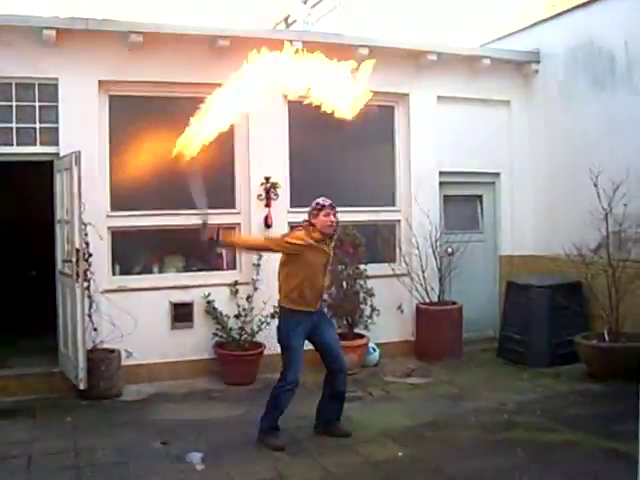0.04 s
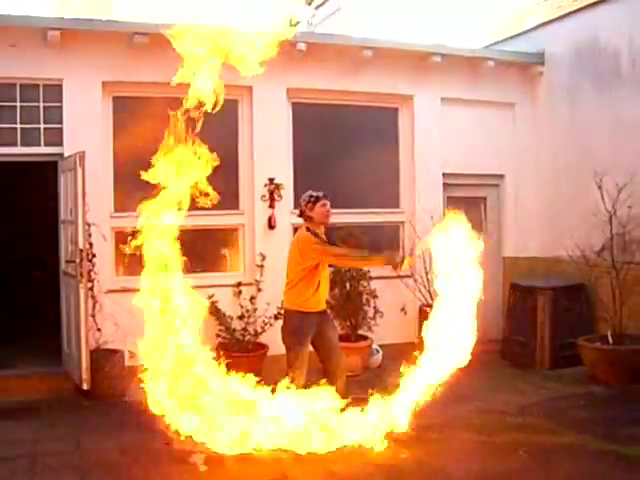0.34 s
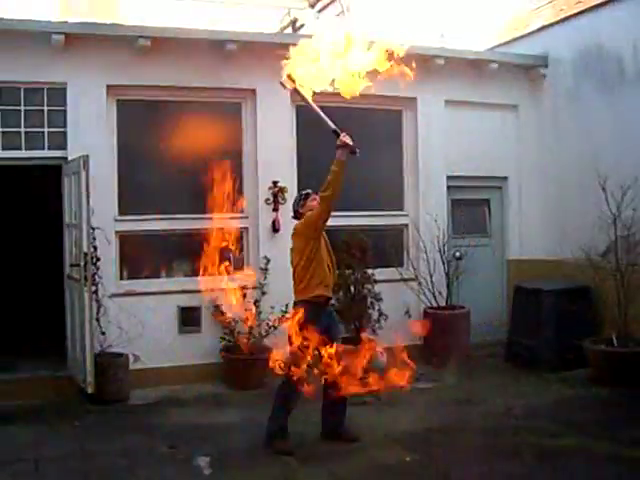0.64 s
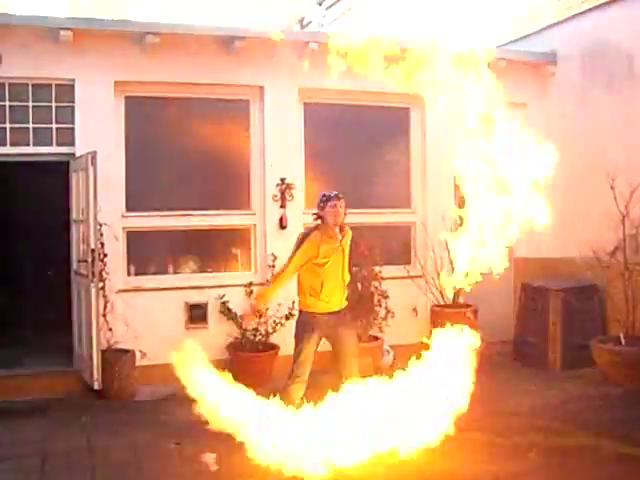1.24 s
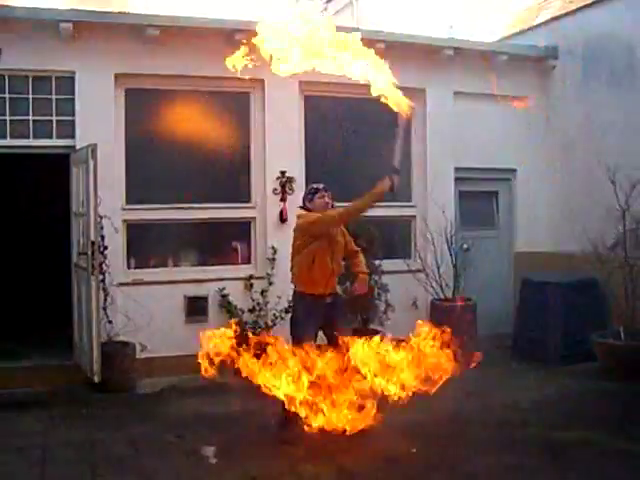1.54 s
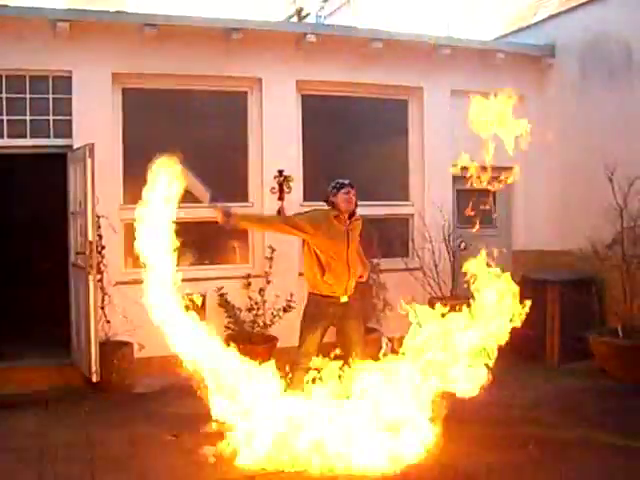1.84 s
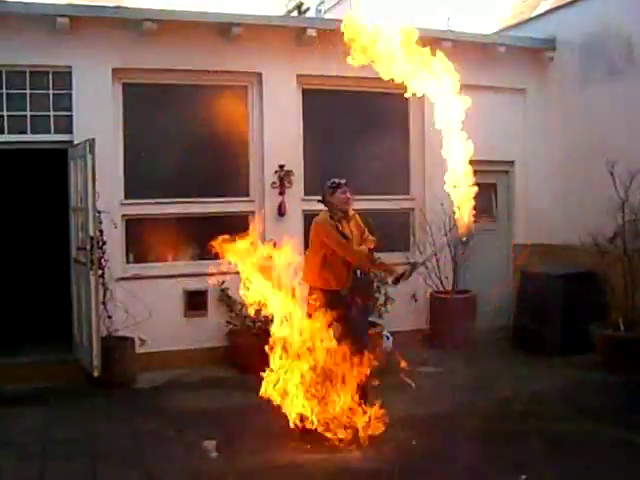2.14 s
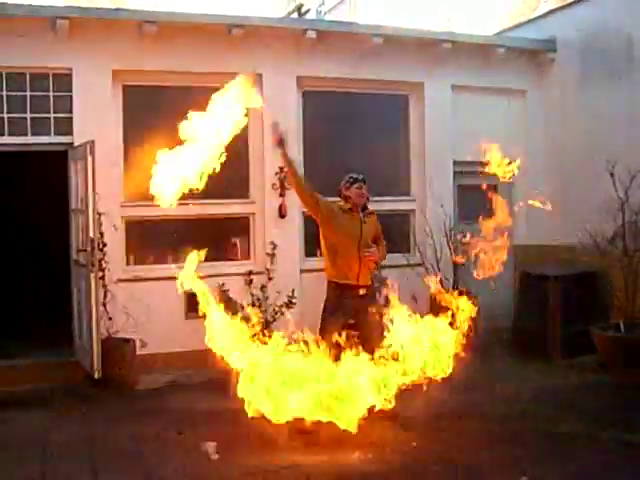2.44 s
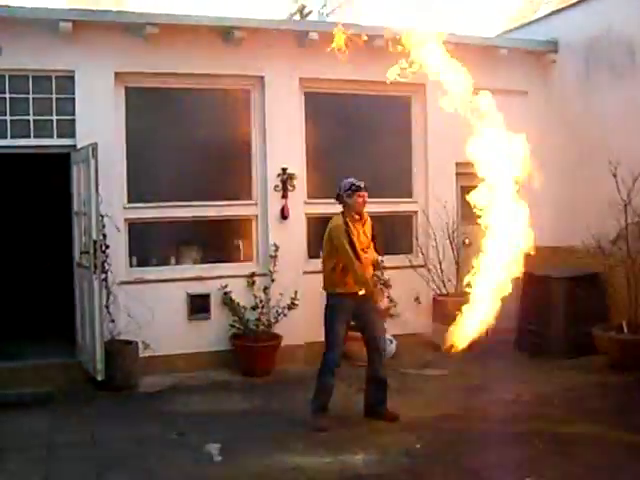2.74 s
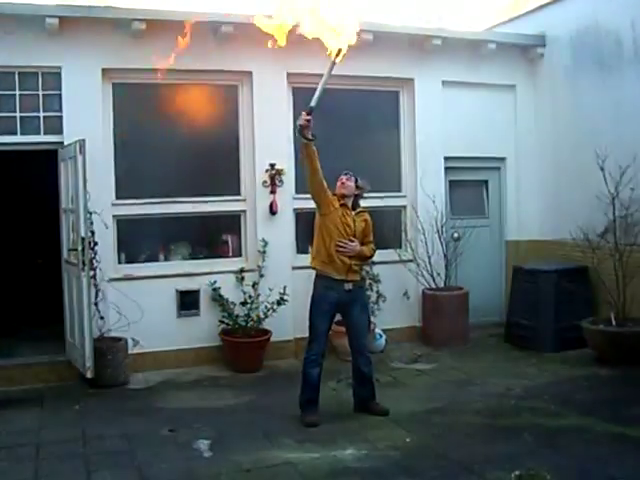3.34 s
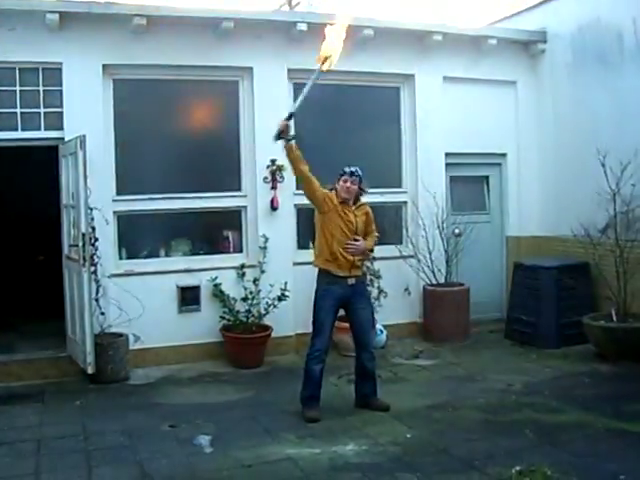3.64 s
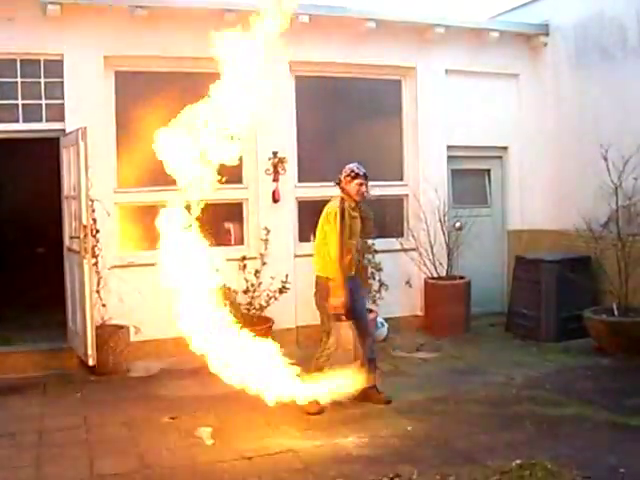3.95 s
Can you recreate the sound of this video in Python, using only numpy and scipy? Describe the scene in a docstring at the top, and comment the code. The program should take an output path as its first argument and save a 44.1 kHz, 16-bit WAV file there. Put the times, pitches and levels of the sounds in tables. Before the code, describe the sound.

A burning torch whooshes through the air right at the start, then again at about 1.2, 1.7, 2.3 and 2.8 seconds. Each sweep falls in pitch and trails a low, throbbing roar of flame, over a wavering hiss. From about 3.1 to 3.7 seconds the fire burns more quietly, before one last strong whoosh near 3.9 seconds. The courtyard walls add a faint, short echo.

```python
"""Flaming torch swung in a courtyard

A torch goes round in big circles, six sweeps in four seconds, with faint echoes off the walls.
Its head hisses as air feeds it; each sweep whooshes, then the trailing fireball roars and shoves
the air in slow throbs. A small camera microphone adds a bright peak and a narrow notch."""
import sys
import numpy as np
from scipy import signal
from scipy.fft import rfft, irfft
from scipy.io import wavfile
from scipy.ndimage import uniform_filter1d

SR = 44100
rng = np.random.default_rng(int(sys.argv[2]) if len(sys.argv) > 2 else 0)


def wrap_up_sound(samples):
    """Save the sound to the file named by the first command line argument, as 16-bit audio."""
    columns = np.atleast_2d(samples).T
    # keep every value between -1 and 1, then stretch to whole-number steps
    tamed = np.clip(columns, -1, 1)
    steps = np.round(tamed * 32767).astype(np.int16)
    wavfile.write(sys.argv[1], SR, steps)


N = 4 * SR


def amp(db):
    """Decibels to gain."""
    return 10 ** (np.asarray(db) / 20)


def unit(x):
    """Scales to an rms of 1."""
    return x / np.sqrt(np.mean(x ** 2) + 1e-20)


def curve(points, column=1):
    """One column of a time table, sample by sample."""
    table = np.transpose(points)
    return np.interp(np.arange(N) / SR, table[0], table[column])


def over_hz(points, hz):
    """Reads a table on a log-frequency axis."""
    table_hz, value = np.transpose(points)
    return np.interp(np.log(hz + 1), np.log(table_hz + 1), value)


def coloured(x, colour):
    """Gives x a spectrum, at an rms of 1."""
    gain = amp(over_hz(colour, np.fft.rfftfreq(N, 1 / SR)))
    return unit(irfft(rfft(x) * gain, N))


def flutter(rate_hz, depth_db):
    """Random gain of turbulence, wavering most at half of rate_hz."""
    hz = np.fft.rfftfreq(N, 1 / SR)
    wobble = irfft(rfft(rng.standard_normal(N)) * (hz / rate_hz) * np.exp(-hz / rate_hz * 2), N)
    return amp(depth_db * unit(wobble))


def pops(per_s, spread_db):
    """A random train of tiny bursts of unequal size."""
    size = amp(spread_db * np.minimum(rng.exponential(1, N), 5))
    return size * rng.choice([-1., 1.], N) * (rng.random(N) < per_s / SR)


def steadied(x, span_s):
    """Evens out the slow chance swells of a noise, so that the swing sets its level."""
    size = max(int(span_s * SR), 2)
    power = uniform_filter1d(uniform_filter1d(x ** 2, size), size)
    return x / np.sqrt(abs(power) + 1e-9)


def resonate(x, hz, width_hz):
    """A steep resonance that follows the curve hz."""
    turn = np.exp(2j * np.pi * np.cumsum(hz) / SR)
    pole = np.exp(-np.pi * width_hz / SR)
    return (turn * signal.lfilter([(1 - pole) ** 2], [1, -2 * pole, pole * pole], x / turn)).real


def add(mix, start_s, sound):
    """Mixes a sound in at a time, cutting what falls outside."""
    at = int(round(start_s * SR))
    sound = sound[max(-at, 0):]
    part = mix[max(at, 0):][:len(sound)]
    part += sound[:len(part)]


def courtyard(x):
    """A short wash of echoes off the walls, the high treble dying first."""
    # Each row: frequency in Hz, seconds for the echoes to fall by 60 dB.
    decay = [(60, 0.22), (500, 0.4), (3000, 0.34), (14000, 0.098)]
    first_wall_s = 0.0105
    echoes = rng.standard_normal(SR) * (rng.random(SR) < 1 / 20)
    echoes *= np.arange(SR) > first_wall_s * SR
    hz, t, bands = signal.stft(echoes, SR, nperseg=256)
    bands = bands * amp(-60 * t / over_hz(decay, hz)[:, None])
    tail = signal.istft(bands, SR, nperseg=256)[1]
    return signal.fftconvolve(x, tail / np.linalg.norm(tail))[:N]


def throb():
    """Slow pressure waves from the expanding hot air, with a quicker shudder on top."""
    # Each row: time in seconds, relative level of the throb in dB.
    levels = [(0, -32.5), (.2, -24), (.35, -15.5), (.45, -22), (.7, -21), (1.03, -29.5), (1.15, -18),
              (1.25, -22), (1.35, -18), (1.5, -22.5), (1.73, -20), (1.83, -14.5), (2.2, -16.5), (2.3, -18),
              (2.55, -22.5), (2.8, -17), (3.1, -31.5), (3.4, -24.5), (3.65, -40.5), (3.95, -16)]
    # A big flame heaves, a small one shudders. Each row: frequency in Hz, relative level in dB.
    heave_colour = [(2, -28), (6, -11), (10, 4), (15, -10), (28, -16), (48, -33), (120, -56), (500, -73)]
    shudder_colour = [(6, -22), (14, -6), (20, 3), (29, -4.5), (37, -7), (47, -13), (120, -40), (500, -68)]
    heave_db, shudder_db, shudder_db_per_db = -0.5, -10, 0.76
    level_db = curve(levels)
    heave = steadied(coloured(rng.standard_normal(N), heave_colour), span_s=0.11)
    shudder = steadied(coloured(rng.standard_normal(N), shudder_colour), span_s=0.15)
    return amp(heave_db + level_db) * heave + amp(shudder_db + shudder_db_per_db * level_db) * shudder


def torch_hiss():
    """Rushing gas and a fine sizzle of sparks, brighter when the torch burns harder."""
    # Each row: time in seconds, relative level of the hiss in dB.
    levels = [(0.0, -16.5), (0.23, -18), (0.47, -28), (0.57, -21), (0.62, -22), (0.7, -18.5), (0.79, -24),
              (0.91, -26), (1.02, -16.5), (1.11, -17), (1.15, -19.5), (1.27, -18), (1.3, -23.5),
              (1.37, -25.5), (1.68, -17.5), (1.71, -21), (1.75, -23), (1.78, -17), (1.84, -24.5),
              (1.9, -27.5), (2.02, -27.5), (2.08, -20.5), (2.16, -25), (2.33, -19), (2.38, -26.5),
              (2.45, -24.5), (2.53, -30), (2.64, -22.5), (2.68, -24), (2.72, -19), (2.94, -25.5),
              (3.03, -30.5), (3.24, -27), (3.39, -23), (3.53, -33.5), (3.58, -33.5), (3.7, -27.5),
              (3.72, -28.5), (3.82, -19.5), (3.94, -18.5), (3.97, -25.5), (4.0, -23)]
    # Spectrum of the burning head. Each row: frequency in Hz, relative level in dB.
    colour = [(200, -22), (700, -6), (1500, -1.5), (2000, -1), (2350, -3.5), (3000, 0.5), (5000, -0.5),
              (7500, -0.5), (12000, -3.5), (14000, -10), (17000, -14.5)]
    hiss_db, spark_db = -1.5, -17
    treble_hz, tilt_db_per_db = 7600, 0.23
    level_db = curve(levels)
    gas = rng.standard_normal(N)
    sparks = amp(spark_db) * unit(pops(per_s=2500, spread_db=2.5))
    rush = coloured(gas + sparks, colour) * flutter(rate_hz=41, depth_db=0.5)
    treble = signal.sosfiltfilt(signal.butter(3, treble_hz, "high", fs=SR, output="sos"), rush)
    tilt = amp(tilt_db_per_db * (level_db - level_db.mean()))
    return amp(hiss_db + level_db) * (rush - treble + tilt * treble) / np.sqrt(tilt)


def fireball():
    """Behind the torch, small pockets of fuel flare up and merge into a roar and a deeper boom."""
    # Each row: time in seconds, relative levels of the roar and of the boom in dB.
    levels = [(0.0, -23, -35), (0.06, -24.5, -25.5), (0.22, -22.0, -23), (0.54, -27.5, -31),
              (0.7, -36.0, -34.5), (1.02, -26.0, -23.5), (1.1, -21.5, -30.5), (1.2, -22.5, -22.0),
              (1.58, -27.0, -27), (1.68, -20, -20.5), (1.76, -19, -15.5), (1.84, -27.5, -26),
              (1.94, -26.5, -18), (1.98, -34, -32), (2.06, -25.5, -34), (2.14, -31.5, -32),
              (2.24, -22.5, -20.5), (2.32, -20.5, -22), (2.48, -34.0, -24.5), (2.56, -30, -33),
              (2.68, -25.5, -33), (2.84, -20, -17.5), (3.0, -28.5, -18.5), (3.08, -37, -28.0),
              (3.16, -33.0, -40), (3.22, -36.5, -32), (3.42, -32.0, -35.5), (3.58, -44.5, -42.5),
              (3.74, -31, -37), (3.84, -21, -20.5), (3.9, -22.0, -16.5), (4.0, -23.5, -24.0)]
    # Spectra of the roar and the boom as heard in the courtyard; the narrow peaks and dips in the bass are the
    # yard's own resonances. Each row: frequency in Hz, relative level in dB.
    roar_colour = [(90, -19.5), (135, -18), (158, 0), (176, -7), (195, 1.5), (222, 1.5), (285, -2),
                   (340, -7), (500, -12.5), (1200, -38)]
    boom_colour = [(30, -25), (45, -15), (53, -1.5), (62, -13), (70, 8), (80, -7.5), (90, -4.5), (101, 1.5),
                   (111, -2.5), (124, -1.5), (150, -11.5), (250, -24), (800, -60)]
    puffs_per_s, spread_db, roar_db = 1400, 3.0, 0.2
    roar = steadied(coloured(pops(puffs_per_s, spread_db), roar_colour), span_s=0.11)
    boom = steadied(coloured(pops(puffs_per_s, spread_db), boom_colour), span_s=0.083)
    burning = amp(roar_db + curve(levels)) * roar + amp(curve(levels, column=2)) * boom
    return burning * flutter(rate_hz=38, depth_db=0.6)


def whoosh():
    """Flapping turbulence where the flame is dragged through the air."""
    # Each row: time in seconds, relative level of the whoosh in dB.
    levels = [(0.0, -23), (0.12, -24.5), (0.24, -31), (0.38, -29.5), (0.58, -34.5), (0.68, -29),
              (0.78, -31), (0.98, -30.5), (1.02, -22.5), (1.14, -27.5), (1.18, -23.5), (1.32, -30.5),
              (1.7, -24), (1.76, -29), (1.88, -30.5), (1.94, -28), (1.98, -33.5), (2.18, -30.5),
              (2.24, -25), (2.38, -30.5), (2.48, -31.5), (2.56, -37), (2.7, -26.5), (2.9, -28.0),
              (3.1, -35.5), (3.42, -33.0), (3.58, -35), (3.72, -32.5), (3.84, -20), (4.0, -32.5)]
    # Spectrum of the torn air. Each row: frequency in Hz, relative level in dB.
    colour = [(120, -37), (300, -6), (420, -1.5), (750, 0), (1000, -3.5), (1400, -5), (2000, -9.5),
              (3000, -20.5), (6000, -49)]
    whoosh_db = -0.5
    air = steadied(coloured(rng.standard_normal(N), colour), span_s=0.086)
    return amp(whoosh_db + curve(levels)) * air * flutter(rate_hz=73, depth_db=1.0)


def sweeps():
    """At the fastest point of a swing the eddies swell into a fireball, so their pitch falls."""
    # Each row: time of the fastest point in seconds, level there in dB.
    swings = [(.1, -26.5), (1.19, -31), (1.7, -24), (2.265, -22.5), (2.82, -30.5), (3.86, -23.5)]
    centre_hz, fall_octaves_per_s, spread_s = 542, 11.9, 0.053
    t = np.arange(-SR // 5, SR // 5) / SR
    hz = centre_hz * 2 ** (-fall_octaves_per_s * t)
    swell = np.exp(-(t / spread_s) ** 2)
    mix = np.zeros(N)
    for at_s, level_db in swings:
        eddies = resonate(rng.standard_normal(len(t)), hz, width_hz=490)
        add(mix, at_s + t[0], amp(level_db) * swell * steadied(eddies, span_s=0.035))
    return mix


def scene():
    """The flame, its echoes and its pressure waves as they reach one microphone."""
    echo_db = -19
    flame = torch_hiss() + whoosh() + sweeps() + fireball()
    return (flame + amp(echo_db) * courtyard(flame) + throb())[None]


def record(dry):
    """The microphone's treble peak and soft overload, the camera's narrow notch and the band limit."""
    peak_hz, peak_width_hz, peak_db = 10130, 1530, 7.5
    notch_hz, edge_hz = 7985, 17200
    knee = amp(-5)  # the microphone rounds off peaks above this level
    hz = np.fft.rfftfreq(N, 1 / SR)
    lift = amp(peak_db * np.exp(-((hz - peak_hz) / peak_width_hz) ** 2))
    bright = irfft(rfft(dry) * lift, N)
    clipped = np.clip(bright, -knee, knee)
    rounded = clipped + np.tanh((bright - clipped) * 10) / 10
    notched = signal.lfilter(*signal.iirnotch(notch_hz, Q=24, fs=SR), rounded)
    lowpass = signal.firwin(801, edge_hz, window=("kaiser", 9), fs=SR)
    return signal.oaconvolve(notched, lowpass[None], "same")


dry = scene()
out = record(dry)
wrap_up_sound(out)
```